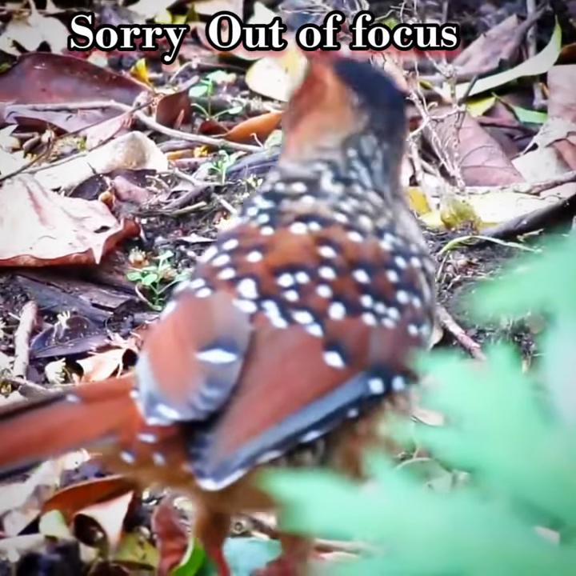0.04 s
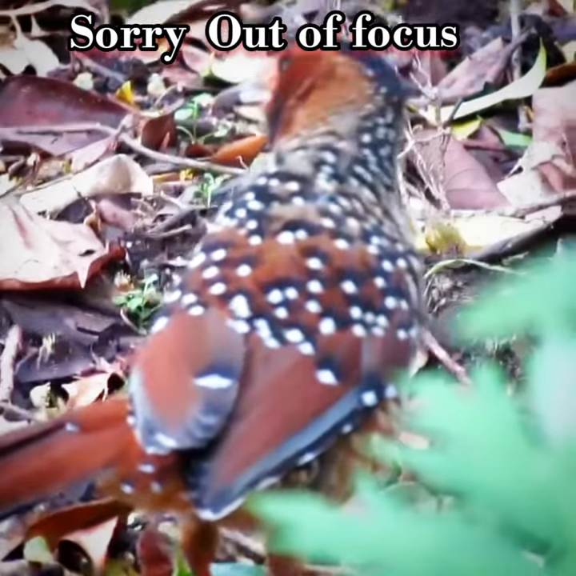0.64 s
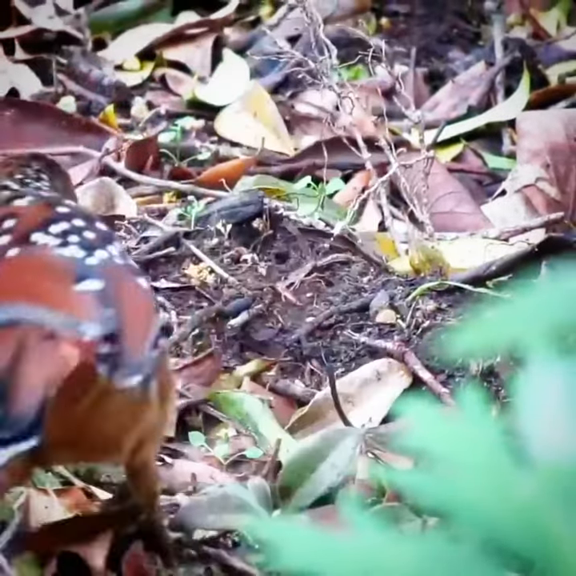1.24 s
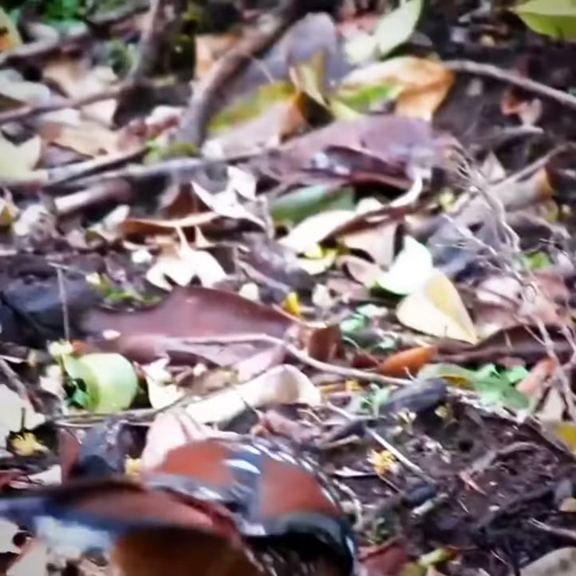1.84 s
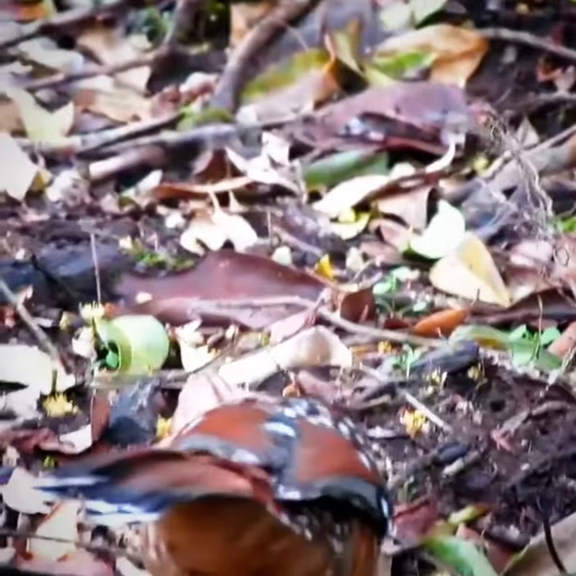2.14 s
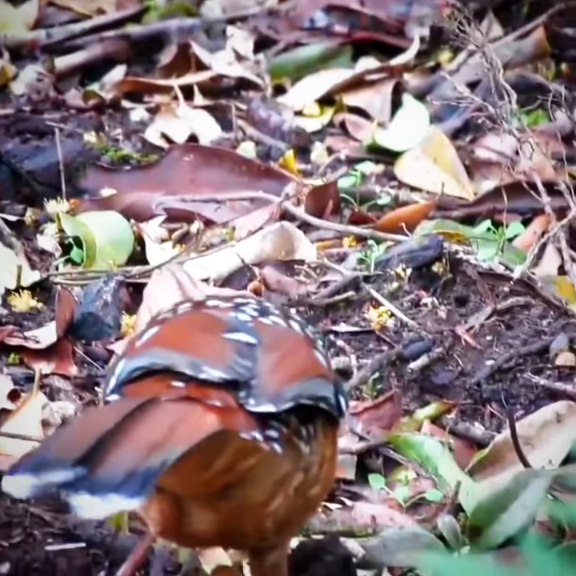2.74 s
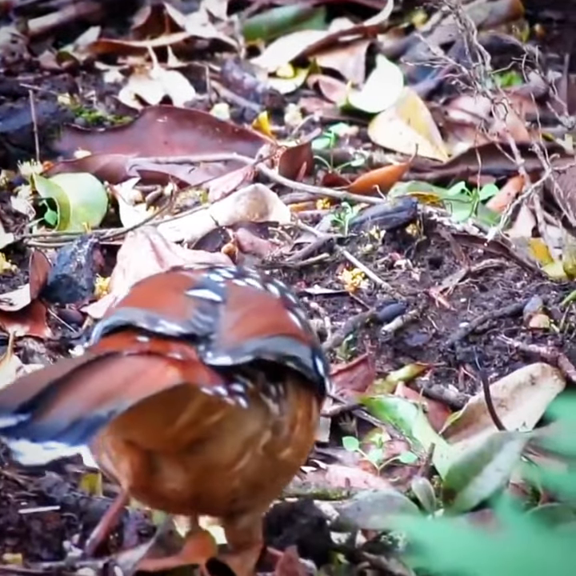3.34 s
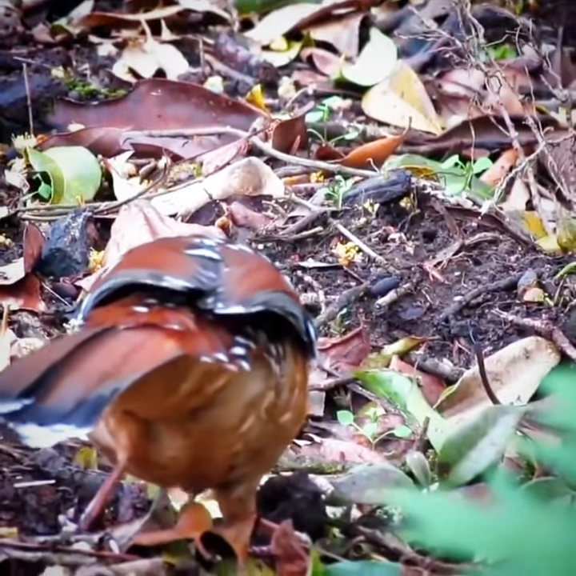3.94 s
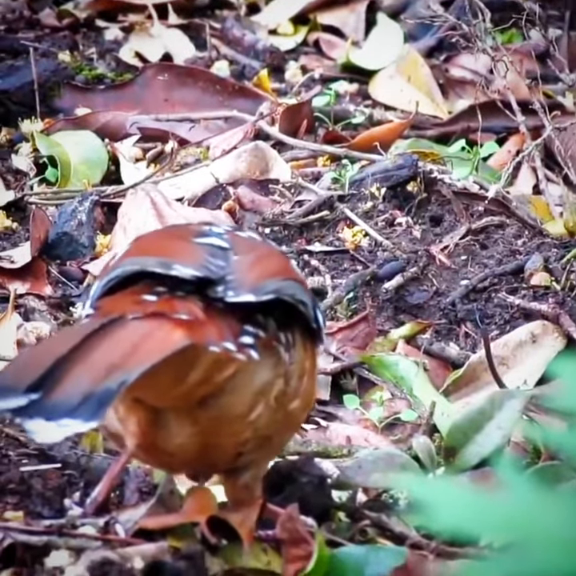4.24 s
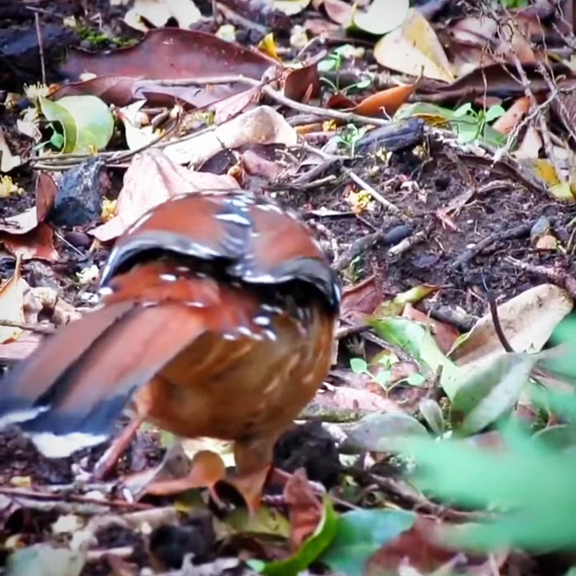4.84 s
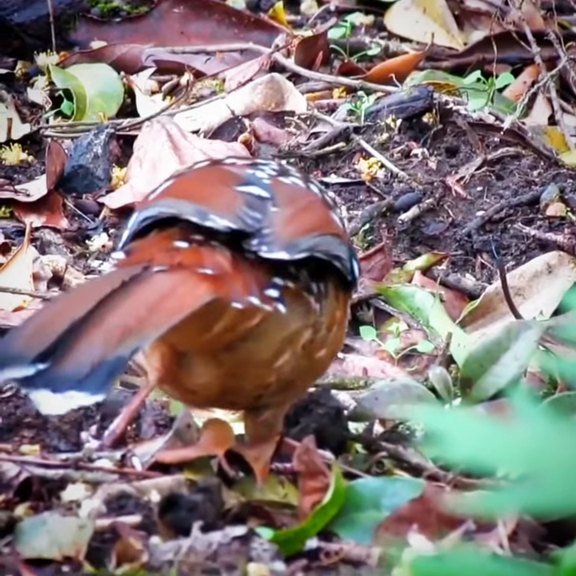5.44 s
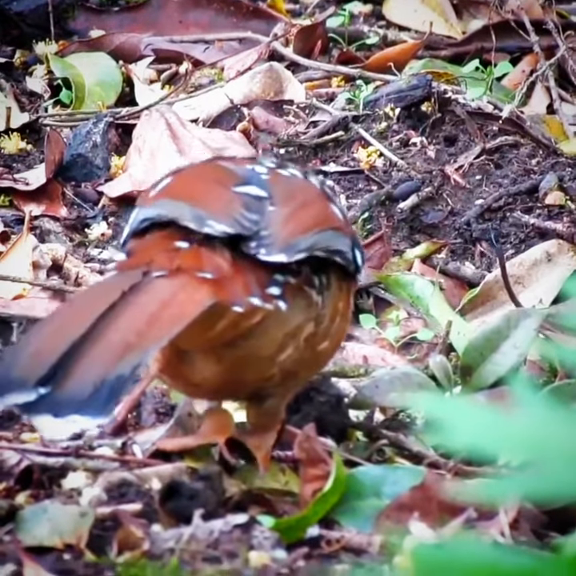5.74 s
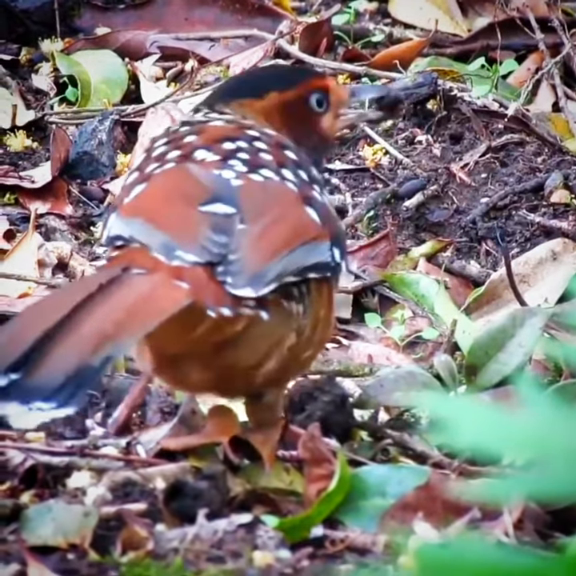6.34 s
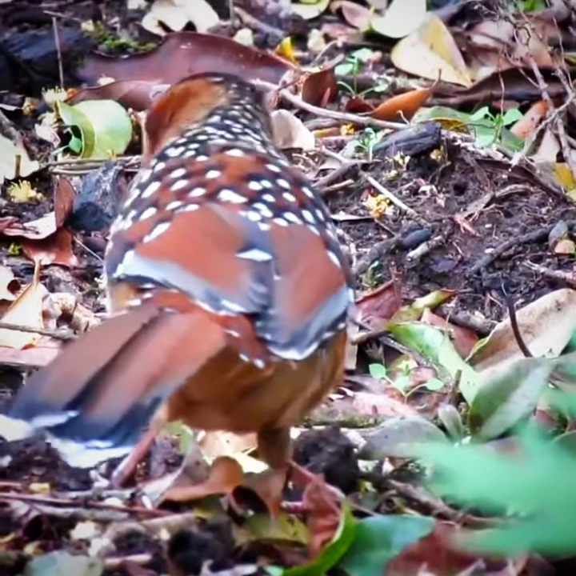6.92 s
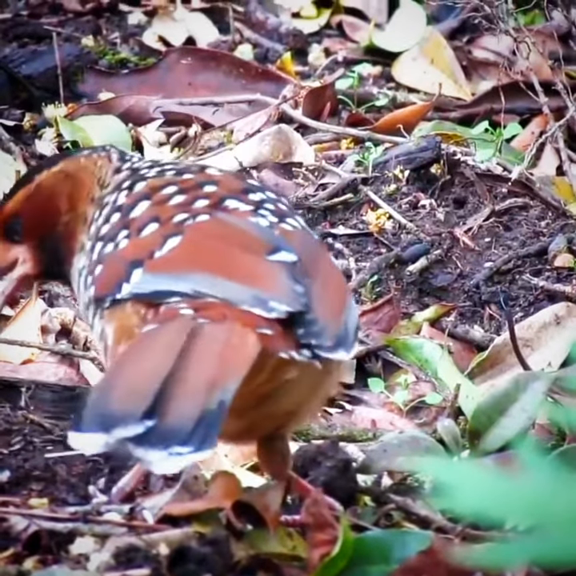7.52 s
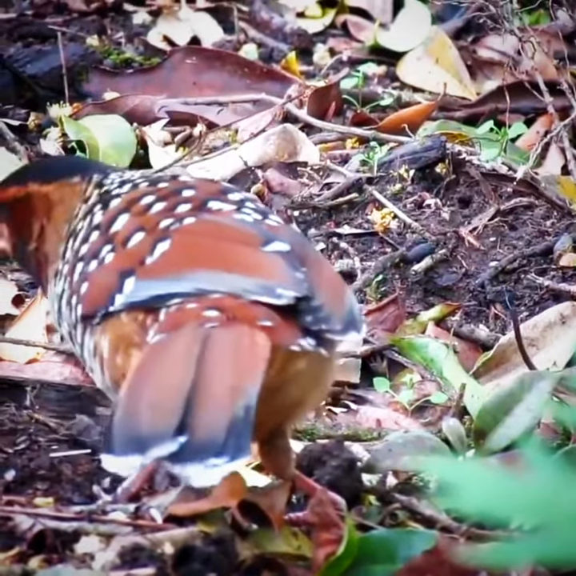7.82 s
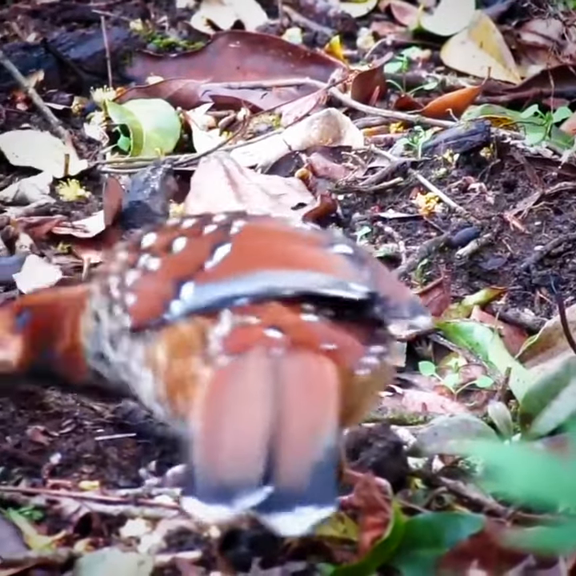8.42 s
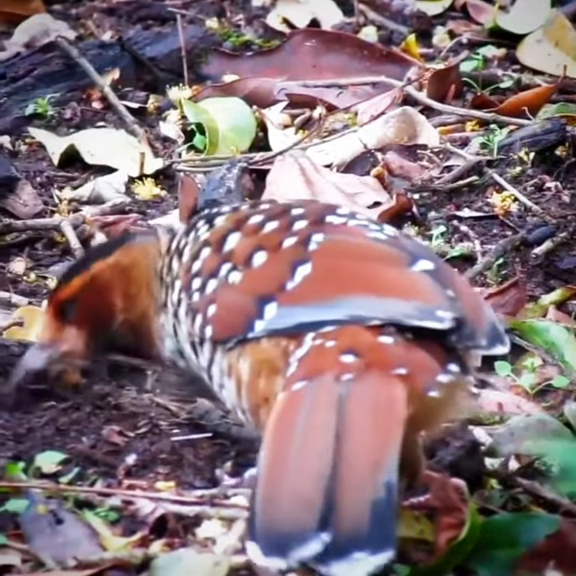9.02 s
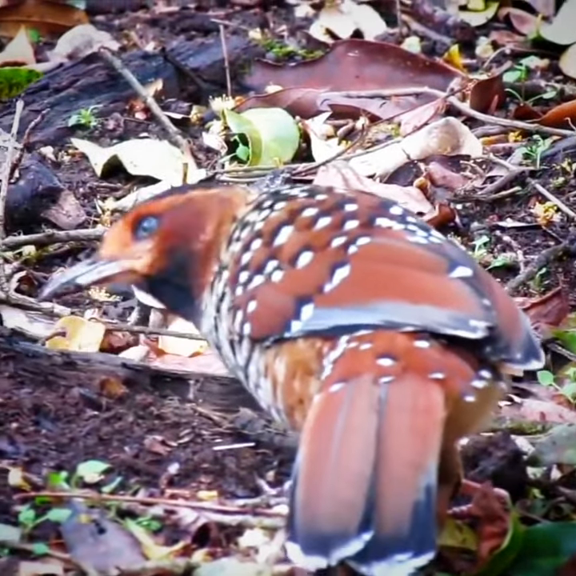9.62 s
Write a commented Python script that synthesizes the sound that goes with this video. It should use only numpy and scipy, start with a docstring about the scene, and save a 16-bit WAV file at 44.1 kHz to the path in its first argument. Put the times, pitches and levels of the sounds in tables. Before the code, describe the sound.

Over a soft, steady forest hiss, a distant bird whistles a quick slurred phrase, and another steps slowly down in pitch. Thin high calls follow. Midway, a nearby bird sings one loud phrase of four high, gliding notes. Fainter whistles and chirps then return. Close to the microphone, a foraging bird now and then rustles dry leaves and snaps a small twig.

```python
"""Laughingthrushes whistle short slurred phrases in a forest, one near and two farther off.
Other birds add long thin whistles and chirps. Each note is one pure, gliding tone from the syrinx,
which trunks and foliage scatter into a short wash. Close by, a bird forages: dry leaves crackle
and twigs knock and snap, over the steady hiss of the forest."""
import sys
import numpy as np
from scipy import signal
from scipy.fft import rfft, irfft
from scipy.io import wavfile
from scipy.ndimage import uniform_filter1d

SR = 44100
rng = np.random.default_rng(int(sys.argv[2]) if len(sys.argv) > 2 else 0)


def persist_wave(psi):
    """Save psi, clipped to +-1, as 16-bit WAV."""
    counts = np.round(np.clip(psi, -1, 1) * 32767).astype(np.int16)
    wavfile.write(sys.argv[1], SR, np.atleast_2d(counts).T)


N = 426447


def amp(db):
    """Decibels to gain."""
    return 10 ** (np.asarray(db) / 20)


def unit(x):
    """Scales to rms 1."""
    return x / np.sqrt(np.mean(x ** 2) + 1e-20)


def add(mix, start_s, sound):
    """Mixes a sound in at its start time."""
    part = mix[max(round(start_s * SR), 0):][:len(sound)]
    part += sound[:len(part)]


def drift(count, rate_hz):
    """Smooth random modulation of rms about 1, rolled off above the given rate."""
    hz = np.fft.rfftfreq(2 * SR, 1 / SR)
    spectrum = rfft(rng.standard_normal(2 * SR)) * np.exp(-(hz / rate_hz) ** 2)
    return unit(irfft(spectrum))[:count]


def swell(progress, attack, release, edge_db):
    """Note envelope in dB: up from edge_db, hold, back down; attack and release are shares of the note."""
    return edge_db * (np.maximum(1 - progress / attack, 0) + np.maximum(1 - (1 - progress) / release, 0))


def slides(table, bend, attack=1, release=1, edge_db=0):
    """Note contours that slide between two pitches: early if bend is negative, late if positive."""
    progress = np.linspace(0, 1, 60)
    glide = np.expm1(bend * progress) / np.expm1(bend)
    envelope_db = swell(progress, attack, release, edge_db)
    return [np.column_stack([start + length * progress, first + (last - first) * glide, db + envelope_db])
            for start, length, first, last, db in table]


def arches(table, roundness, attack, release, edge_db):
    """Note contours whose pitch runs to a crest or a trough, turns smoothly and runs back."""
    progress, notes = np.linspace(0, 1, 60), []
    envelope_db = swell(progress, attack, release, edge_db)
    for start, length, turn, first_hz, turn_hz, last_hz, db in table:
        from_turn = np.interp(progress, [0, turn, 1], [1, 0, 1]) ** roundness
        hz = turn_hz + (np.where(progress < turn, first_hz, last_hz) - turn_hz) * from_turn
        notes.append(np.column_stack([start + length * progress, hz, db + envelope_db]))
    return notes


def syrinx(notes, waver, flutter_db=2.0):
    """One pure, slightly unsteady tone follows each contour of (time_s, pitch_hz, level_db) points."""
    out = np.zeros(N)
    for note in notes:
        times, pitch_hz, level_db = np.transpose(note)
        times = np.sort(times)
        t = np.arange(times[0], times[-1], 1 / SR)
        hz = np.interp(t, times, pitch_hz)
        hz = uniform_filter1d(hz, size=260, mode="nearest")  # muscles round the corners
        hz = hz * (1 + waver * drift(len(t), rate_hz=67))
        gain = amp(np.interp(t, times, level_db) + flutter_db * drift(len(t), rate_hz=40))
        fades = np.clip(np.minimum(t - t[0], t[-1] - t) / 0.0015, 0, 1)
        add(out, times[0], np.sqrt(2) * gain * fades * np.sin(2 * np.pi * np.cumsum(hz) / SR))
    return out


def forest(voice, scatter_db, scatter_t60_s, tail_db, tail_t60_s):
    """Direct sound, dense scatter off nearby trunks and leaves, and a weaker tail from deep woods."""
    t = np.arange(SR) / SR
    echoes = rng.standard_normal((2, SR)) * (rng.random((2, SR)) < 3000 / SR)  # about 3000 a second
    scatter = echoes[0] * amp(-60 * t / scatter_t60_s) * (1 - np.exp(-t / 0.0036))
    tail = echoes[1] * amp(-60 * t / tail_t60_s) * (1 - np.exp(-t / 0.04))
    response = amp(scatter_db) * scatter / np.linalg.norm(scatter)
    response += amp(tail_db) * tail / np.linalg.norm(tail)
    response[0] += 1  # the direct path
    return signal.fftconvolve(voice, response / np.linalg.norm(response))[:N]


# EQ curve of the forest bed: frequency_hz, relative_db
HISS_CURVE = [(15, -39), (25, -7.5), (193, -2.5), (267, -3.5), (359, 0), (421, -3), (482, -3), (684, -3),
              (970, -3.5), (1530, -6.5), (1950, -7), (3630, -11), (6380, -13.5), (9300, -19.5),
              (15500, -26.5)]


def forest_hiss(level_db=-51.5, patchy_db=0.71):
    """A steady bed of shaped noise, with faint patches drifting through its spectrum."""
    frames, hz = N // 256 + 5, np.fft.rfftfreq(1024, 1 / SR)
    real, imaginary, patches = rng.standard_normal((3, frames, len(hz)))
    patches = uniform_filter1d(patches, size=20, axis=0)  # smooth in time
    patches = unit(uniform_filter1d(patches, size=10, axis=1))  # and in frequency
    curve_hz, curve_db = np.transpose(HISS_CURVE)
    colour_db = np.interp(np.log(hz + 1), np.log(curve_hz + 1), curve_db)
    spectra = (real + 1j * imaginary) * amp(colour_db + patchy_db * patches)
    _, noise = signal.istft(spectra.T, nperseg=1024, noverlap=768)
    return amp(level_db) * unit(noise[:N])


# Held notes that open the high whistler's phrase: start_s, length_s, first_hz, last_hz, level_db
HIGH_HOLDS = [(2.98, 0.14, 5080, 4840, -47), (3.15, 0.099, 4900, 4886, -47),
              (7.028, 0.069, 5080, 4940, -44.5), (7.095, 0.137, 4830, 4855, -48),
              (7.24, 0.042, 4880, 4855, -43)]
# Drooping notes that close it: start_s, length_s, first_hz, last_hz, level_db
HIGH_DROOPS = [(.015, 0.16, 4560, 4080, -50), (3.335, .19, 4924, 4370, -50),
               (3.665, 0.091, 4530, 3950, -47.5), (7.43, .17, 4910, 4350, -48.5),
               (7.67, .16, 4570, 3990, -49.5)]


def high_whistler():
    """A high voice settles on level notes, then lets the closing ones sag."""
    holds = slides(HIGH_HOLDS, bend=-4, attack=0.19, release=0.23, edge_db=-7)
    droops = slides(HIGH_DROOPS, bend=1.9)
    voice = syrinx(holds + droops, waver=0.0047)
    return forest(voice, scatter_db=0, scatter_t60_s=0.32, tail_db=-8, tail_t60_s=0.94)


# Scooped calls: start_s, length_s, turn_share, first_hz, turn_hz, last_hz, level_db
SWOOPS = [(.33, .13, 0.19, 4180, 4170, 4340, -64), (.66, 0.074, 0.39, 4400, 3950, 4280, -56),
          (3.2, 0.21, .1, 3670, 3650, 4400, -60), (3.765, 0.15, 0.36, 4010, 3340, 3960, -56),
          (6.645, 0.28, 0.23, 4200, 3640, 4520, -58.5), (7.19, .225, .46, 4600, 3380, 3950, -55)]


def distant_swoops():
    """Far-off whistles dip and climb again, trailing a long wash."""
    notes = arches(SWOOPS, roundness=1.2, attack=0.18, release=0.08, edge_db=-1)
    voice = syrinx(notes, waver=0.0076, flutter_db=2.5)
    return forest(voice, scatter_db=0, scatter_t60_s=0.34, tail_db=-4, tail_t60_s=1.3)


# Thin, high calls: start_s, length_s, first_hz, last_hz, level_db
SLIP_NOTES = [(.52, 0.12, 5350, 4750, -61), (2.86, 0.048, 6470, 4850, -53.5),
              (2.995, 0.037, 5880, 5830, -56), (3.135, 0.036, 5900, 5400, -55),
              (3.425, 0.077, 5580, 5180, -61), (3.665, .095, 5370, 5100, -57), (3.81, 0.1, 4860, 5230, -54),
              (3.97, .045, 5140, 4700, -54), (6.475, 0.17, 5540, 4770, -62), (8.36, 0.2, 5550, 4850, -63)]


def distant_slips():
    """Shaky little glides, mostly downward, arrive with more scatter than direct sound."""
    notes = slides(SLIP_NOTES, bend=1.4, attack=0.15, release=0.13, edge_db=-2)
    voice = syrinx(notes, waver=0.0113, flutter_db=3.5)
    return forest(voice, scatter_db=5, scatter_t60_s=0.36, tail_db=-2, tail_t60_s=1.6)


# Dry leaves flicked and trodden: start_s, level_db, centre_hz, decay_s
LEAF_RUSTLES = [(0.727, -48, 7900, 0.039), (.854, -57, 7500, .015), (1.275, -49, 7950, 0.0068),
                (1.425, -56, 9100, 0.01), (1.457, -53, 6940, 0.018), (3.377, -52, 8000, .004),
                (7.188, -44, 7000, 0.021), (7.534, -50, 7600, 0.013), (7.8425, -50, 9000, .0015),
                (9.579, -47, 6400, .003), (9.59, -50, 10000, .006), (9.599, -52, 14500, .008),
                (9.644, -57, 14000, .012)]


def dry_leaves(width_octaves=0.29, grain_db=4, body_db=-17):
    """A dry leaf gives a dying clump of tiny cracks, coloured by one broad resonance."""
    out, t = np.zeros(N), np.arange(SR // 4) / SR
    hz = np.fft.rfftfreq(len(t), 1 / SR)
    for start_s, level_db, centre_hz, decay_s in LEAF_RUSTLES:
        cracks = rng.standard_normal(len(t)) * amp(grain_db * rng.standard_normal(len(t)))
        colour = np.exp(-(np.log2((hz + 1) / centre_hz) / width_octaves) ** 2) + amp(body_db)
        crackle = unit(irfft(rfft(cracks) * colour, len(t)))
        add(out, start_s, amp(level_db) * crackle * np.exp(-t / decay_s))
    return out


# Arched calls: start_s, length_s, turn_share, first_hz, turn_hz, last_hz, level_db
CHIRPS = [(.945, 0.055, .1, 2420, 2430, 1900, -54.5), (1.145, 0.056, 0.9, 2505, 3250, 2870, -46.5),
          (4.28, 0.1, 0.43, 2330, 2430, 1870, -57), (7.31, .152, 0.46, 2280, 2420, 1674, -46.5),
          (7.563, .095, 0.6, 1723, 3310, 2280, -47.5)]


def close_chirps():
    """Soft chirps swell as they arch over in pitch, close enough to stay fairly dry."""
    notes = arches(CHIRPS, roundness=2.1, attack=0.79, release=0.12, edge_db=-11)
    voice = syrinx(notes, waver=0.0053)
    return forest(voice, scatter_db=-7.5, scatter_t60_s=0.32, tail_db=-9.5, tail_t60_s=1.0)


# Contour points of each named laughingthrush syllable: offset_s, pitch_hz, relative_db
THRUSH_SYLLABLES = { "flick": [(0, 5330, -22), (.012, 5263, -3.5), (.048, 5270, -1.5), (.063, 5620, 0.5),
                    (.089, 6550, -9), (.104, 5850, -0.5), (.12, 5726, 6), (.168, 5600, -7),
                    (.212, 5700, -16)], "quick flick": [(0, 5380, -6), (.02, 5220, 2.5), (.043, 5350, -3.5),
                    (.06, 5770, -1), (.079, 6950, -12.5), (.1, 5680, -0.5), (.122, 5520, 2),
                    (.165, 5530, -24), (.2, 5570, -27)], "warble": [(0, 4850, -37), (.019, 4913, 6.5),
                    (.042, 4954, 1), (.059, 5070, -3), (.085, 4550, -4.5), (.095, 4720, -1),
                    (.108, 6050, -6.5), (.128, 5260, 2), (.165, 5020, -21.5)],
                    "sagging warble": [(0, 5140, -5.5), (.032, 4973, -3), (.06, 5030, 4), (.074, 4500, -4),
                    (.09, 4340, -4.5), (.106, 5950, -4.5), (.119, 5780, -1), (.134, 5220, 4.5),
                    (.167, 5040, -12)], "rise": [(0, 4930, -15), (.028, 5085, 1.5), (.065, 5210, 1),
                    (.105, 5300, -5), (.135, 5215, -15.5)], "hooked slur": [(0, 4400, -16.5),
                    (.025, 4820, 2), (.033, 5420, -6.5), (.07, 4945, 3.5), (.098, 3760, -9),
                    (.119, 2896, -14), (.146, 4400, -6.5), (.16, 4456, 0), (.19, 4460, -22)],
                    "slur": [(0, 4430, -11), (.018, 4680, 0), (.033, 5370, -3), (.056, 5030, 4),
                    (.077, 4050, -3.5), (.104, 3200, -13), (.137, 4690, -3), (.175, 4655, -19)]}
# Cue list of their song: start_s, distance, syllable, stretch_ratio, pitch_ratio, level_db
THRUSH_CUES = [ (5.218, "near", "flick", 1.016, 0.99, -23), (5.573, "near", "warble", 0.99, 0.99, -22.5),
               (5.765, "near", "rise", 0.97, 1.0, -23.5), (5.91, "near", "hooked slur", 0.99, 1.004, -23.5),
               (.985, "far", "quick flick", 1.0, 1.0, -36.5),
               (1.258, "far", "sagging warble", 0.98, 1.0, -39), (1.445, "far", "rise", 0.97, 1.02, -41),
               (1.572, "far", "slur", 1.02, 1.0, -39.5), (7.432, "far", "quick flick", 1.17, 1.01, -48),
               (7.71, "far", "sagging warble", 1.02, 1.012, -42),
               (7.915, "far", "rise", 0.82, 1.015, -40.5), (8.025, "far", "slur", 1.05, 0.99, -44)]


def laughingthrushes():
    """Phrases of four slurred syllables; the far ones are softer, shakier and wetter than the near one."""
    notes = {"near": [], "far": []}
    for start_s, distance, syllable, stretch, transpose, level_db in THRUSH_CUES:
        contour = np.array(THRUSH_SYLLABLES[syllable]) * (stretch, transpose, 1)
        notes[distance].append(contour + (start_s, 0, level_db))
    near_voice = syrinx(notes["near"], waver=0.0022)
    near = forest(near_voice, scatter_db=6, scatter_t60_s=0.28, tail_db=-13, tail_t60_s=0.72)
    far_voice = syrinx(notes["far"], waver=0.00654)
    far = forest(far_voice, scatter_db=9.5, scatter_t60_s=0.4, tail_db=-4.5, tail_t60_s=0.65)
    return near + far


# One descending phrase: start_s, length_s, first_hz, last_hz, level_db
DESCENDING_NOTES = [(1.815, 0.19, 4220, 3715, -49.5), (2.057, 0.038, 3990, 3220, -48.5),
                    (2.125, 0.062, 3240, 3390, -46), (2.235, 0.16, 3320, 3310, -44),
                    (2.475, 0.21, 3180, 3166, -43), (2.705, 0.25, 3210, 3163, -46.5)]


def stepping_whistler():
    """A slow whistle steps down the scale, sliding onto each note."""
    notes = slides(DESCENDING_NOTES, bend=-6.5, attack=0.17, release=0.16, edge_db=-9)
    voice = syrinx(notes, waver=0.0021)
    return forest(voice, scatter_db=-3.5, scatter_t60_s=0.36, tail_db=-16, tail_t60_s=1.0)


# Sustained calls: start_s, length_s, first_hz, last_hz, level_db
SUSTAINED_NOTES = [(2.62, .78, 2139, 2130, -60.5), (6.03, 1.26, 2260, 2180, -61.5)]


def long_whistler():
    """A faint whistle holds an almost level pitch and lingers among the trees."""
    notes = slides(SUSTAINED_NOTES, bend=-0.794, attack=0.33, release=0.25, edge_db=-3.5)
    voice = syrinx(notes, waver=0.0049)
    return forest(voice, scatter_db=-2, scatter_t60_s=1.0, tail_db=-14, tail_t60_s=1.0)


# Ringing modes of a twig: pitch_hz, relative_db, t60_s
TWIG_MODES = [(395, -4.5, 0.042), (1650, -14, .012), (2240, 4.5, 0.027), (2710, -3, 0.019),
              (6200, -2, 0.0074)]
# Twigs knocked or snapped on the ground: start_s, level_db, ring_time_ratio
TWIG_HITS = [(6.598, -49, 0.7), (7.843, -37.5, 0.19), (9.611, -48, 0.95), (9.616, -38, 0.61)]


def twigs():
    """Each knock rings the short modes of a twig; a snap is over almost at once."""
    out, t = np.zeros(N), np.arange(SR // 10) / SR
    for start_s, level_db, ring_ratio in TWIG_HITS:
        ring = sum(amp(db - 60 * t / (t60_s * ring_ratio)) * np.sin(2 * np.pi * hz * t)
                   for hz, db, t60_s in TWIG_MODES)
        add(out, start_s, amp(level_db) * ring)
    return out


def scene():
    """Mono mix of birdsong, foraging and the forest bed."""
    song = laughingthrushes() + stepping_whistler() + high_whistler()
    calls = distant_slips() + distant_swoops() + long_whistler() + close_chirps()
    foraging = dry_leaves() + twigs()
    return (song + calls + foraging + forest_hiss())[None]


def record(dry, cutoff_hz=15720):
    """A steep low-pass trims the very top of the treble."""
    lowpass = signal.firwin(511, cutoff_hz, window=("kaiser", 9), fs=SR)
    return signal.oaconvolve(dry, lowpass[None], "same")


dry = scene()
out = record(dry)
persist_wave(out)
```